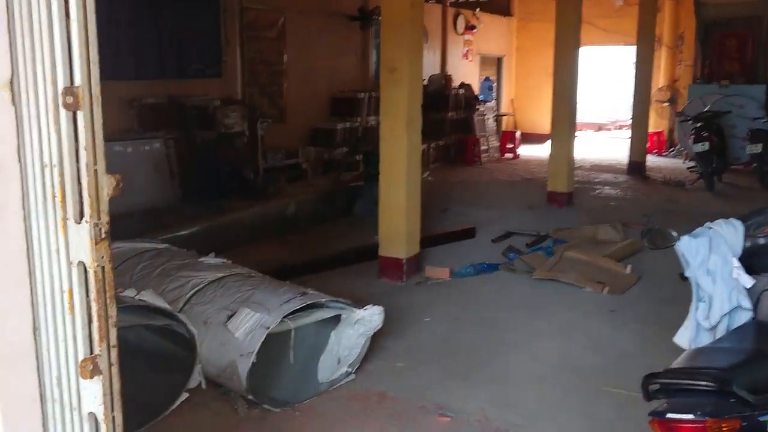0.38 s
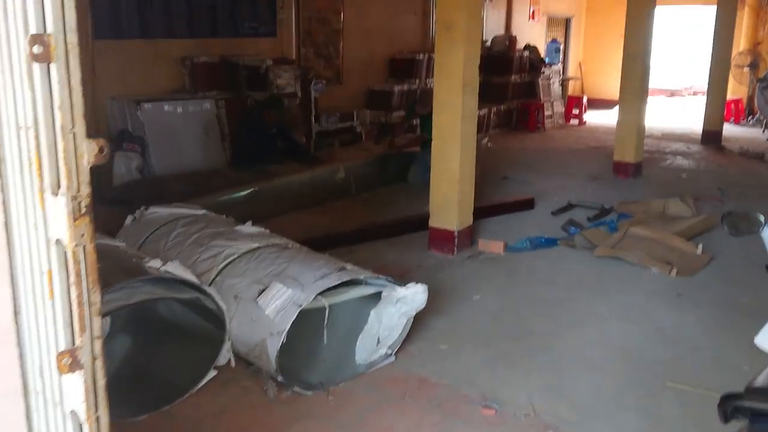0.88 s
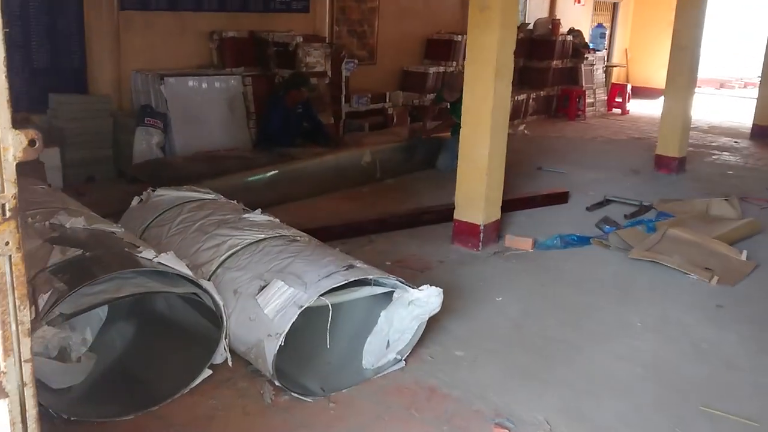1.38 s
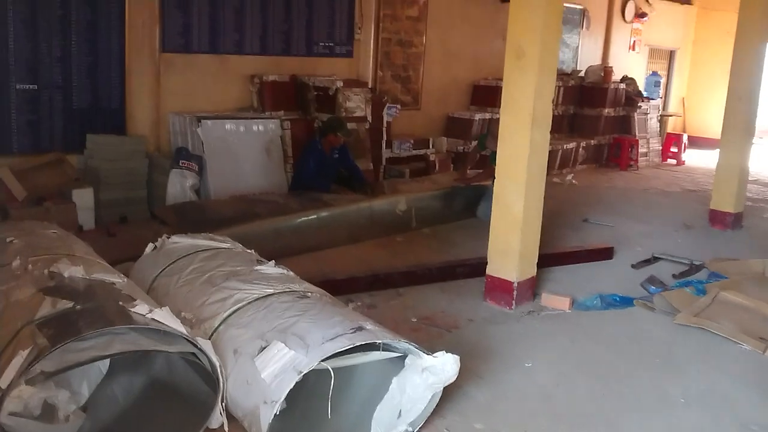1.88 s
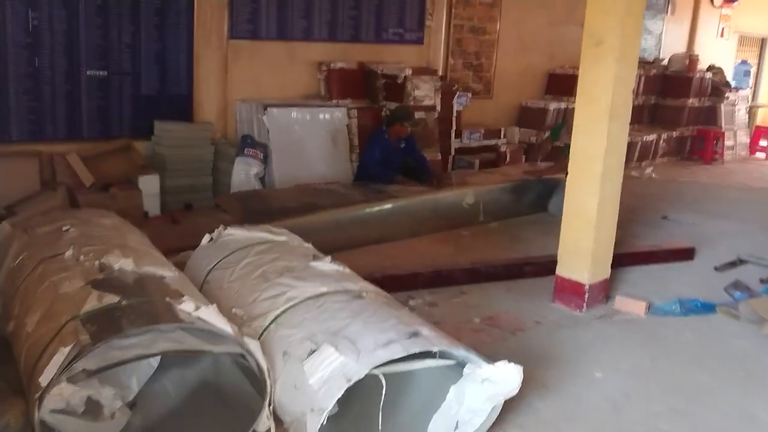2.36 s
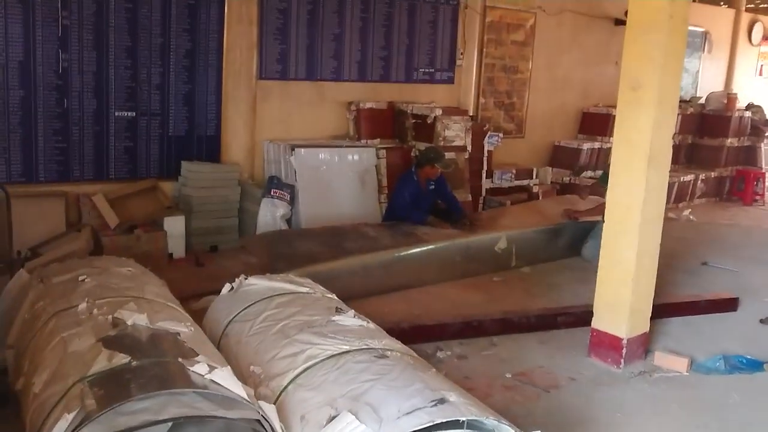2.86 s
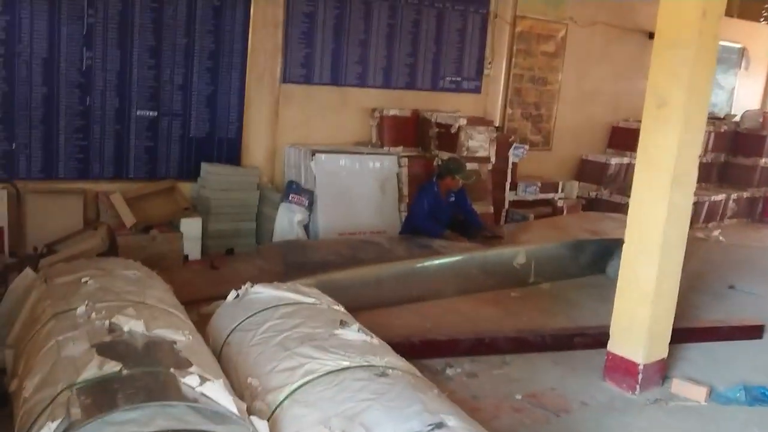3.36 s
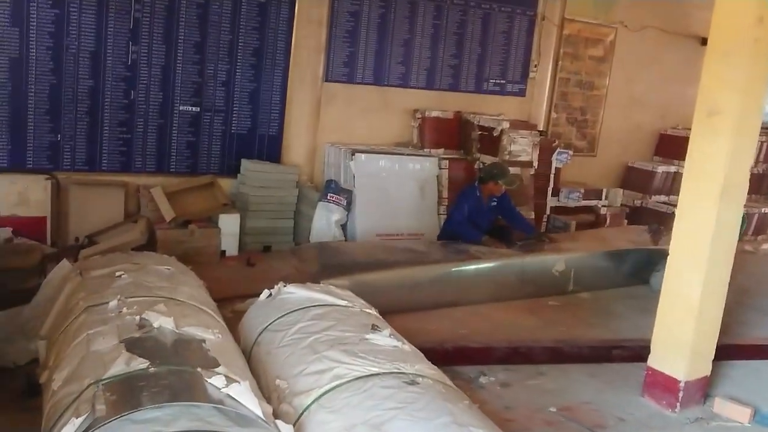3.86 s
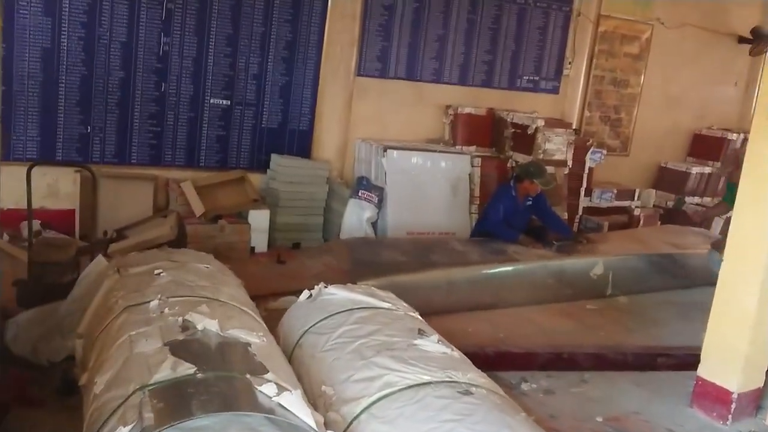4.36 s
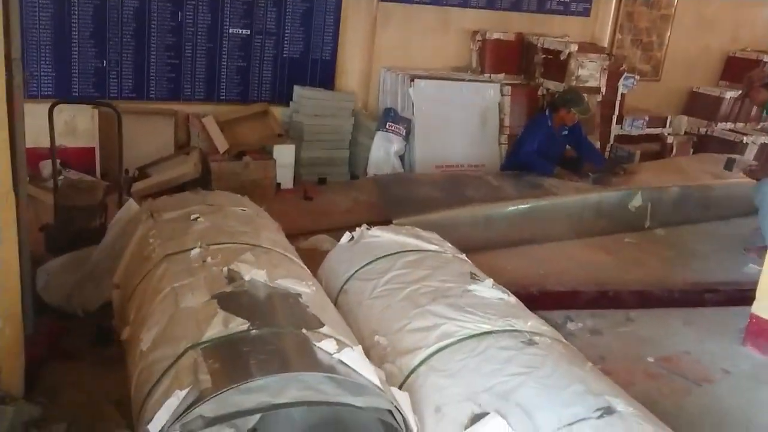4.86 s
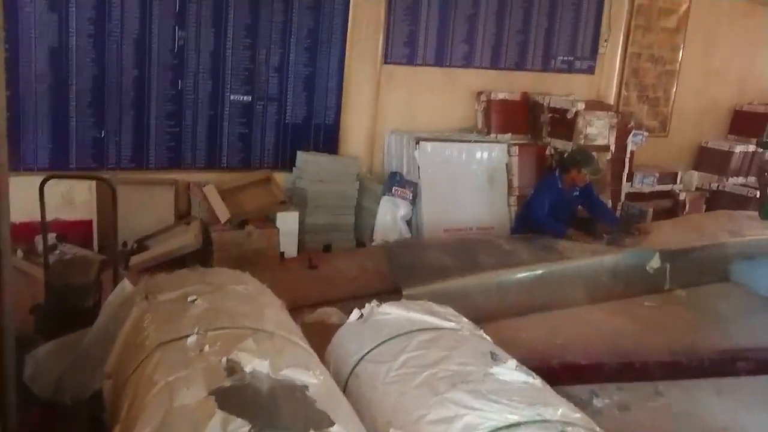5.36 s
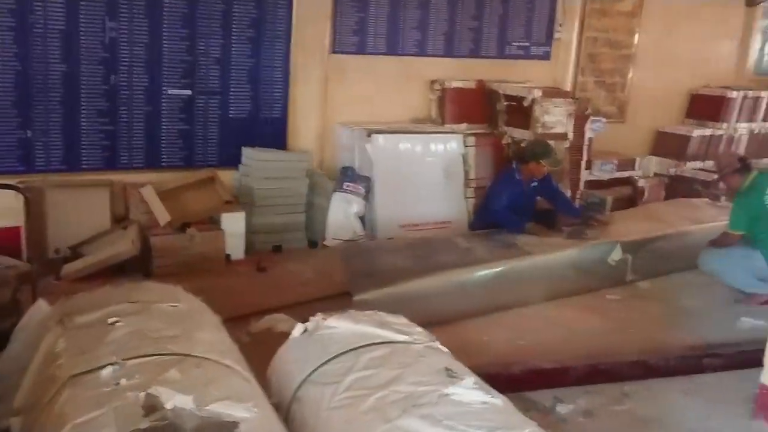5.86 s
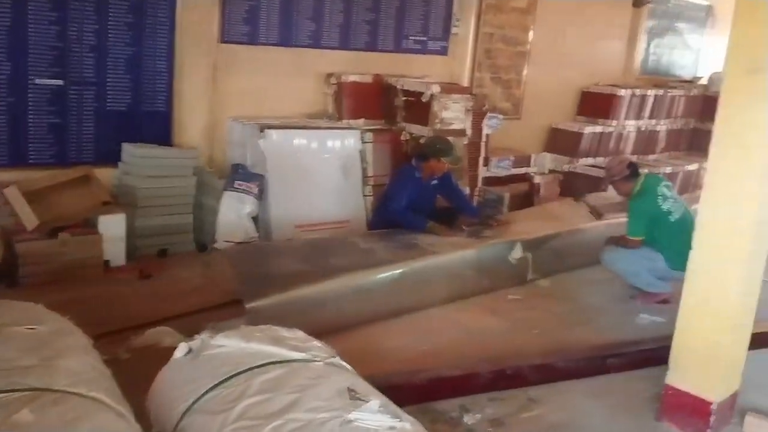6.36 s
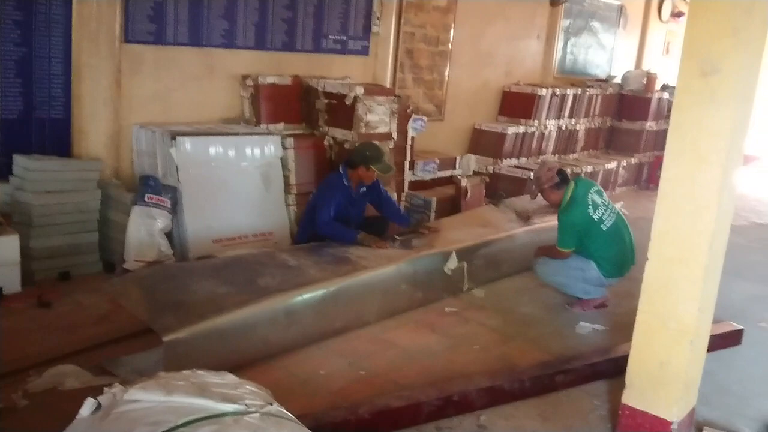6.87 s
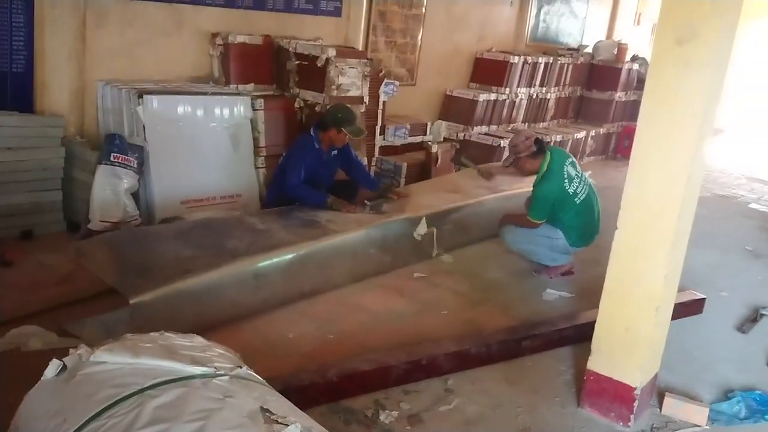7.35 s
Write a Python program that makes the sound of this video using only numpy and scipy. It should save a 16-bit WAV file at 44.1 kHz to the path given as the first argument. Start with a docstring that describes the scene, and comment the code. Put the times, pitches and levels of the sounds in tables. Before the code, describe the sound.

A mallet beats a long folded metal sheet in a bare echoing hall, each low thud bursting into a short rattling crash, with two pauses.

```python
"""A crash of sheet metal is already dying away; then a mallet beats the sheet's fold again and again.
Each blow is a low thud of few damped modes that spreads into a crash, noise shaped band by band.
A large bare hall adds discrete echoes and a diffuse decay. Sandals scuff close by in filtered noise.
An engine idles far off as a harmonic series, over street noise; two unlike ports and a limiter
pick it all up."""
import sys
import numpy as np
from scipy import signal
from scipy.fft import rfft, irfft, next_fast_len
from scipy.io import wavfile
from scipy.ndimage import uniform_filter1d, minimum_filter1d

SR = 44100
rng = np.random.default_rng(int(sys.argv[2]) if len(sys.argv) > 2 else 0)


def store_wav(level_fs):
    """Save 16-bit WAV to argv[1]."""
    pcm = np.round(np.clip(np.atleast_2d(level_fs), -1, 1) * 32767)
    wavfile.write(sys.argv[1], SR, pcm.T.astype(np.int16))


def magnitude_from_level(level_db):
    """Linear magnitude for a level in decibels (20 dB per decade)."""
    exponent = np.asarray(level_db, float) / 20
    return 10 ** exponent


N = 340893
LEAD = SR // 5  # samples of scene before time zero
M = N + LEAD

# blows of the mallet: (time [s], thud level [dB], thud pitch [Hz], crash level [dB],
# brightness [dB per octave])
BLOW_LIST = [(-0.11, -8.5, 256, -14, 0.4), (0.433, -1.5, 254, -11.5, 0.49), (0.959, -4.5, 224, -11, 0.5),
             (1.482, -5, 253, -11.5, 0.5), (1.994, -4.5, 240, -10, 0.52), (2.49, -4.5, 242, -11, 0.5),
             (3.913, -5, 237, -8.5, 0.5), (5.821, -4.5, 237, -7.5, 0.77), (6.387, -5, 164, -5, 0.7),
             (6.876, -3, 299, -9, 1.0), (7.341, -2.5, 282, -11, 0.95)]
# reverberation of the hall: (frequency [Hz], decay by 60 dB [s])
HALL_DECAY = [(60, 2.34), (160, 1.29), (420, 1.43), (1100, 1.19), (2900, 1.18), (7700, 0.53), (12000, 0.38),
              (16000, 0.24)]


def evened(x):
    """Normalization: scales a signal to an rms of 1."""
    return x / np.sqrt(np.mean(x ** 2) + 1e-20)


def read(points, hz):
    """Interpolation: reads a table's columns along a log-frequency axis."""
    f, *columns = np.transpose(points)
    return np.squeeze([np.interp(np.log(hz + 1), np.log(f + 1), column) for column in columns])


def add(mix, s, sound):
    """Superposition: adds a sound to the mix at time s."""
    part = mix[..., round(s * SR) + LEAD:][..., :sound.shape[-1]]
    part += sound[..., :part.shape[-1]]


def field(magnitude, count, size):
    """Diffuse field: two-channel noise of spectrum magnitude(hz, t), its coherence falling with frequency."""
    # coherence of the two channels: (frequency [Hz], left-right likeness [0 to 1])
    likeness = [(60, .99), (180, .99), (350, .94), (700, .68), (1500, .38), (3000, .25), (6000, .03),
                (15000, .01)]
    hz = np.fft.rfftfreq(size, 1 / SR)[:, None]
    t = np.arange(4 * count // size + 5) * (size // 4) / SR
    a, b, c, d = rng.standard_normal((len(t), len(hz), 4)).T
    same = np.clip(read(likeness, hz)[:, None], -1, 1)
    left = a + 1j * b
    right = same * left + np.sqrt(1 - same ** 2) * (c + 1j * d)
    z = np.array([left, right]) * magnitude(hz, t)
    noise = signal.istft(z, nperseg=size, noverlap=3 * size // 4)[1]
    return noise[:, :count] / np.sqrt(size / 3)


def steady_noise(points, count, size):
    """Stationary noise: a field of one fixed spectrum, at an rms of 1."""
    return evened(field(lambda hz, t: magnitude_from_level(read(points, hz))[:, None], count=count, size=size))


def in_hall(x, wet_db):
    """Reverberation: adds diffuse echoes that build from 8 to 30 ms and decay by band."""
    tail = field(lambda hz, t: magnitude_from_level(-60 * t / read(HALL_DECAY, hz)[:, None]), count=3 * SR // 2, size=1024)
    tail *= np.clip((np.arange(tail.shape[1]) / SR - .008) / 0.022, 0, 1)
    tail /= np.linalg.norm(tail[0])
    wet = magnitude_from_level(wet_db) * signal.fftconvolve(x.mean(0)[None], tail, axes=1)
    wet[:, :x.shape[1]] += x
    return wet


def air():
    """Broadband noise: steady rumble and hiss of the street through the open doors."""
    # spectrum of the street: (frequency [Hz], relative level [dB per Hz])
    street = [(30, -13.5), (60, -4), (120, -14), (250, -21), (600, -23.5), (1500, -30.5), (4000, -39),
              (9000, -50), (16000, -71)]
    return magnitude_from_level(-51.5) * steady_noise(street, count=M, size=2048)


def engine():
    """Harmonic series: orders of a distant idling engine's firing rate, each wavering in level."""
    # firing rate over time, and level of the hum as the recorder's gain lets it through:
    # (time [s], firing rate [Hz], level [dB])
    hum = [(0, 42.84, -48), (3.3, 41.23, -46), (5, 40.93, -47), (5.8, 40.9, -48.5), (6.6, 42.5, -38),
           (7.73, 42.4, -50)]
    # partials: (multiple of the firing rate, relative level [dB])
    orders = [(1, 0), (2, -5), (3, -10), (3.5, -19), (4, -21), (5.5, -20)]
    s, hz, db = np.transpose(hum)
    t = (np.arange(M) - LEAD) / SR
    turns = np.cumsum(np.interp(t, s, hz)) / SR
    tone = np.zeros(M)
    for k, order_db in orders:
        waver = evened(signal.resample(rng.standard_normal(60), M))
        partial = np.sin(2 * np.pi * (k * turns + rng.random()))
        tone += magnitude_from_level(order_db + 0.18 * k * waver) * partial
    return np.sqrt(2) * magnitude_from_level(np.interp(t, s, db)) * tone


def steps():
    """Friction: gritty scuffs of soles on concrete as noise bursts, and faint squeaks as fuzzy tones."""
    # scuffs of the sandals: (time [s], level [dB], length [s])
    scuffs = [(1.344, -46, 0.038), (2.433, -67, 0.0183), (3.127, -52, 0.14), (3.453, -60.5, 0.17),
              (4.443, -37.5, 0.074), (4.791, -46.5, 0.032), (4.876, -47, 0.12), (4.917, -44.5, 0.057),
              (5.001, -45.5, 0.071)]
    # spectrum of a scuff: (frequency [Hz], relative level [dB per Hz])
    grit_spectrum = [(500, -2), (2000, 7.5), (5000, 11.5), (10000, 1.5), (16000, -22)]
    # thin high squeaks: (time [s], frequency [Hz], level [dB], decay by 60 dB [s])
    squeaks = [(3.43, 10400, -66, .8), (5.19, 10130, -65, .6)]
    out = np.zeros((2, M))
    for s, db, length in scuffs:
        grit = steady_noise(grit_spectrum, count=SR // 4, size=256)
        u = np.arange(SR // 4) / SR / length
        add(out, s, magnitude_from_level(db) * grit * np.minimum(5 * u, 1) * np.exp(-u ** 2))
    t = np.arange(SR // 2) / SR
    for s, hz, db, t60 in squeaks:
        fuzz = evened(uniform_filter1d(rng.standard_normal((len(t), 2)), size=300, axis=0)).T
        tone = np.sin(2 * np.pi * hz * t) * np.minimum(t / 0.0079, 1)
        add(out, s, magnitude_from_level(db - 60 * t / t60) * fuzz * tone)
    return out


def crash_magnitude(hz, t):
    """Statistical energy: each blow's power swells and dies by band, and the hall smears it in time."""
    # energy climbs slowly into the treble, then dies:
    # (frequency [Hz], rise time constant [s], decay by 60 dB [s])
    spread = [(100, 0.0029, 0.35), (400, 0.0027, 0.51), (1340, 0.021, 0.67), (4600, 0.046, 0.98),
              (14400, 0.04, 0.73)]
    plain_tilt_db, bass_loss_db = 0.79, 19.5  # a blow brighter than plain loses bass, a duller one gains
    echo_over_direct_db = 8.5
    direct_patch_db, echo_patch_db = 3.0, 0.53  # rms of the rattling patches
    rise, t60 = read(spread, hz)[:, :, None]
    power = np.zeros((len(hz), len(t)))
    for s, _, _, crash_db, tilt_db in BLOW_LIST:
        start = s + LEAD / SR
        first = np.searchsorted(t, start + .003)
        age = t[first:first + SR // 100] - start
        bass_db = bass_loss_db * (plain_tilt_db - tilt_db) / (1 + (hz / 220) ** 4)
        db = crash_db + tilt_db * np.log2(hz / 600 + .03) + bass_db - 60 * age / t60
        swell = 1 - 0.89 * np.exp(-age / rise)
        power[..., first:first + len(age)] += (magnitude_from_level(db) * swell) ** 2
    draws = rng.standard_normal((len(t), len(hz), 2)).T
    # smoothed over 9 bins, and over 3 frames (direct) or 12 frames (echo)
    direct_patch, echo_patch = [
        evened(uniform_filter1d(uniform_filter1d(d, size=9, axis=0), size=n, axis=1))
        for d, n in zip(draws, (3, 12))]
    u = t[:SR // 64]
    echo = magnitude_from_level(-60 * u / read(HALL_DECAY, hz)[:, None]) ** 2 * np.clip(u / 0.004, 0, 1) ** 2
    echo /= echo.sum(1, keepdims=True)
    wet = signal.fftconvolve(power, echo, axes=1)[..., :len(t)]
    direct = power * magnitude_from_level(direct_patch_db * direct_patch) ** 2
    return np.sqrt(abs(direct + wet * magnitude_from_level(echo_over_direct_db + echo_patch_db * echo_patch) ** 2))


def crash():
    """High modal density: modes too dense to count become noise, coloured by a minimum-phase filter."""
    # spectrum of the crash noise, bass to treble: (frequency [Hz], relative level [dB per Hz])
    crash_spectrum = [(40, -49.5), (65, -7.5), (95, -13), (130, -2), (172, -3.5), (200, -7.5), (250, -8),
                      (400, -4.5), (520, -7.5), (740, -3.5), (1000, -8.5), (1250, -7), (1600, -14),
                      (2000, -13.5), (4000, -23.5), (8000, -31.5), (16000, -43)]
    size = 2 * next_fast_len(M // 2 + 1)
    colour = magnitude_from_level(read(crash_spectrum, np.fft.rfftfreq(size, 1 / SR)))
    log_gain = np.log(evened(colour))
    mirrored = np.r_[log_gain, log_gain[-2:0:-1]]
    # minimum phase: the filter rings after the blow, never before
    causal = np.exp(np.conj(signal.hilbert(mirrored)))[:len(colour)]
    noise = field(crash_magnitude, count=M, size=512)
    return irfft(rfft(noise, size) * causal, size)[:, :M]


def crack():
    """Impact noise: a short mid-pitched knock, strongest near 800 Hz, as the mallet makes contact."""
    # spectrum of the contact: (frequency [Hz], relative level [dB per Hz])
    contact = [(300, -10), (800, 16), (2000, -1), (3500, -16.5), (8000, -13.5), (16000, -22)]
    t = np.arange(SR // 20) / SR
    noise = steady_noise(contact, count=len(t), size=256)
    return noise * np.exp(-t / 0.015) * np.minimum(t / 0.0018, 1)


def thud(hz):
    """Modal excitation and dispersion: the mallet's wide face pushes the modes near its pitch;
    a falling sweep comes first, as fast waves outrun slow ones."""
    # low bending modes: (frequency [Hz], relative level [dB], decay by 60 dB before the cap below [s])
    bending_modes = [(143.3, 6, 0.21), (149.3, 2.5, 0.27), (171.9, 4.5, 0.3), (222, -2, 0.027),
                     (251.4, 7.5, 0.023), (298, -3, 0.044), (308.5, 6, 0.066), (391, -18, 0.23),
                     (433, 1.5, 0.23)]
    t = np.arange(SR // 2) / SR
    f, db, t60 = np.transpose(bending_modes)[:, :, None]
    level_draw, pitch_draw, phase = rng.standard_normal((3, len(bending_modes), 1))
    near_db = -14.0 * np.log2(f / hz) ** 2 + 0.6 * level_draw
    damped = np.minimum(t60, .2)  # the sheet rests on a beam, so nothing rings long
    cycles = f * (1 + 0.016 * pitch_draw) * t + phase
    ring = (magnitude_from_level(db + near_db - 60 * t / damped) * np.sin(2 * np.pi * cycles)).sum(0)
    ring *= 1 - np.exp(-(t / 0.0088) ** 2)
    sweep_cycles = np.cumsum(hz * (1 + 0.41 * np.exp(-t / 0.0036))) / SR
    sweep_shape = 1.25 * np.exp(-((t - 0.005) / 0.0043) ** 2) * np.minimum(t / 0.0014, 1)
    return np.sin(2 * np.pi * sweep_cycles) * sweep_shape + magnitude_from_level(-6.5) * ring


def deepest_mode(t):
    """Fundamental flexure: the whole length of the sheet bends as one slow, damped mode."""
    hz, t60, db = 66.2, 0.23, -11.5  # Hz, s, dB
    return magnitude_from_level(db - 60 * t / t60) * np.sin(2 * np.pi * hz * t) * (1 - np.exp(-t / 0.015))


def blow(thud_db, hz, crack_lead_s):
    """Early reflections: thud and crack repeat as discrete echoes before the diffuse hall."""
    # floor, wall, pillars: (delay before wander [ms], level [dB], left over right [dB])
    reflections = [(11, -5, 1), (15.5, -5, -1), (24, -8, -1), (32, -8, 1), (41, -10, 0), (49, -10, -1)]
    t = np.arange(SR // 2) / SR
    hit = (thud(hz) + deepest_mode(t)) * np.ones((2, 1))
    hit = np.pad(hit, [(0, 0), (round(crack_lead_s * SR), 0)])[:, :len(t)]
    hit[:, :SR // 20] += magnitude_from_level(-11) * crack()
    early = np.zeros((2, SR // 2 + SR // 10))
    arrivals = [(0, 0.018, 0)] + list(reflections)  # the direct sound comes first
    for (ms, db, side_db), wander in zip(arrivals, rng.uniform(.9, 1.1, len(arrivals))):
        at = min(round(ms * wander * SR / 1000), SR // 10)
        early[:, at:at + SR // 2] += magnitude_from_level(db + np.array([[side_db / 2], [-side_db / 2]])) * hit
    return magnitude_from_level(thud_db) * in_hall(early, wet_db=-7)


def hammering():
    """Path difference: the listener walks on, so every blow draws its own pattern of echo delays."""
    crack_lead_s, pan_db = .002, 1.5  # the contact noise precedes the thud; the sheet lies to the left
    out = crash()
    for s, thud_db, hz, _, _ in BLOW_LIST:
        add(out, s - crack_lead_s, blow(thud_db, hz, crack_lead_s))
    return out * magnitude_from_level([[pan_db / 2], [-pan_db / 2]])


def scene():
    """Superposition: street and engine lie under the steps and the sheet, which sound in the hall."""
    near = hammering() + in_hall(steps(), wet_db=-3.5)[:, :M]
    return (near + engine() + air())[:, LEAD:]


def turned(x):
    """Time and level differences: a turning recorder delays and weights its left port."""
    # bearing of the recorder: (time [s], lag of the left port [ms], left port level [dB])
    bearing = [(0, -0.091, 0.1), (2.5, 0.14, 0.6), (3.5, 0.19, 0.8), (5, 0.1, 2), (5.8, 0.13, 0.3),
               (7.73, 0.0056, 0.8)]
    hz, t, z = signal.stft(x[0], SR, nperseg=512)
    s, ms, db = np.transpose(bearing)
    lag = np.interp(t, s, ms) / 1000
    z = z * magnitude_from_level(np.interp(t, s, db)) * np.exp(-2j * np.pi * hz[:, None] * lag)
    return np.array([signal.istft(z, nperseg=512)[1][:N], x[1]])


def low_pass(x):
    """Removes everything above the highest recorded frequency."""
    return signal.sosfilt(signal.butter(12, 16790, fs=SR, output="sos"), x)


def record(dry):
    """Linear filtering, then compression: unlike ports, and a limiter quick to grip and slow to let go."""
    # colour of each microphone port: (frequency [Hz], gain [dB])
    left_port = [(30, 8.5), (60, 2.5), (400, 5.5), (1000, -0.5), (1800, 6), (4000, -4), (5800, -7),
                 (6300, -73), (6800, -44), (7200, -116), (9000, -5.5), (12000, -10), (13000, 4.5),
                 (15600, 18.5)]
    right_port = [(30, 3), (60, 0.93), (4500, 3.5), (5900, -1.5), (6500, 12), (7200, 9.5), (8200, 5.5),
                  (12500, 8), (15600, 14)]
    hz = np.linspace(0, SR / 2, 1025)
    edge = 1 / (1 + np.exp(np.clip((hz - 15750) / 25, -50, 50)))  # band edge at 15750 Hz
    edge *= hz < SR / 2
    ports = np.array([signal.firwin2(1023, hz, magnitude_from_level(read(port, hz)) * edge, fs=SR)
                      for port in (left_port, right_port)])
    rumble_cut = signal.butter(3, 33, "high", fs=SR, output="sos")
    x = signal.sosfilt(rumble_cut, turned(dry))
    x = magnitude_from_level(8) * signal.oaconvolve(x, ports, "same", axes=1)  # 8 dB of preamplifier gain
    peak_db = 20 * np.log10(-minimum_filter1d(-abs(x).max(0), size=200) + 1e-9)
    fall = np.arange(N) * 16. / SR  # lets go at 16 dB a second
    held_db = np.maximum.accumulate(peak_db + fall) - fall
    over_db = np.maximum(held_db + 8, 0)  # threshold at -8 dB of full scale
    squeeze_db = .7 * uniform_filter1d(over_db, size=100)
    return low_pass(x / magnitude_from_level(squeeze_db))


dry = scene()
out = record(dry)
store_wav(out)
```